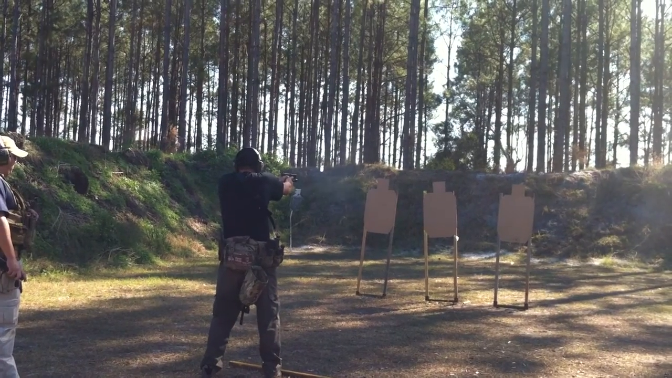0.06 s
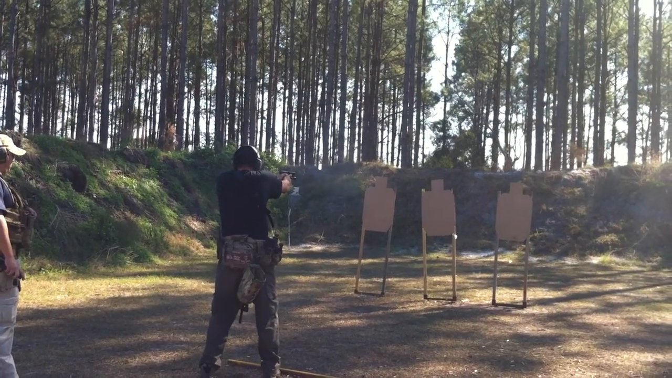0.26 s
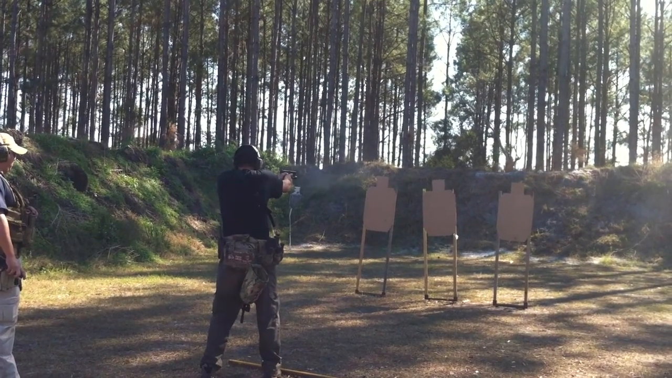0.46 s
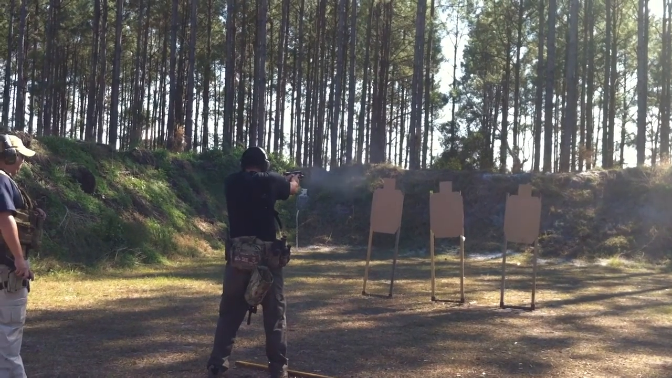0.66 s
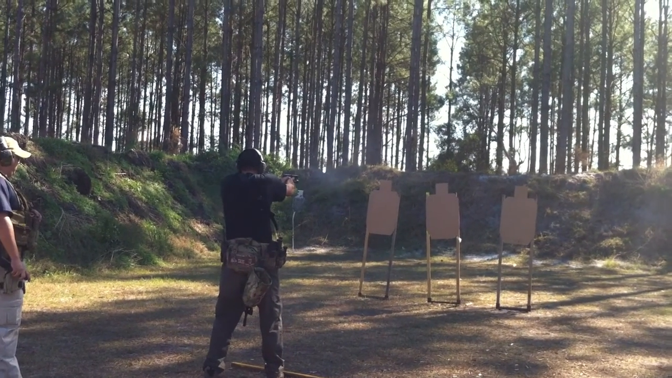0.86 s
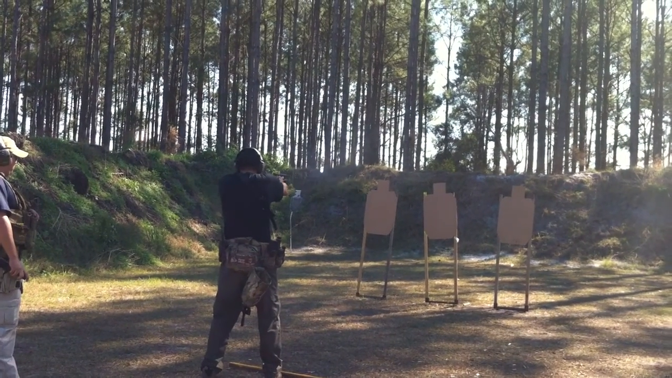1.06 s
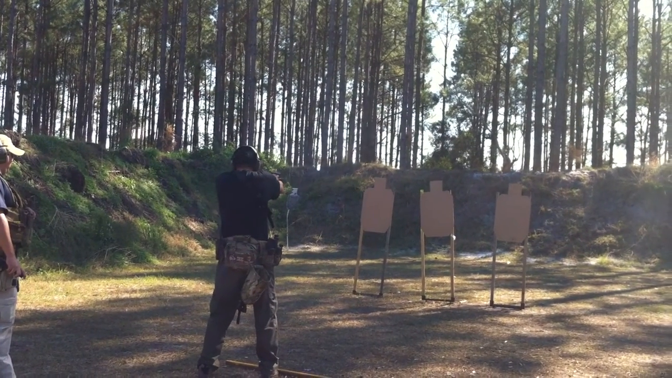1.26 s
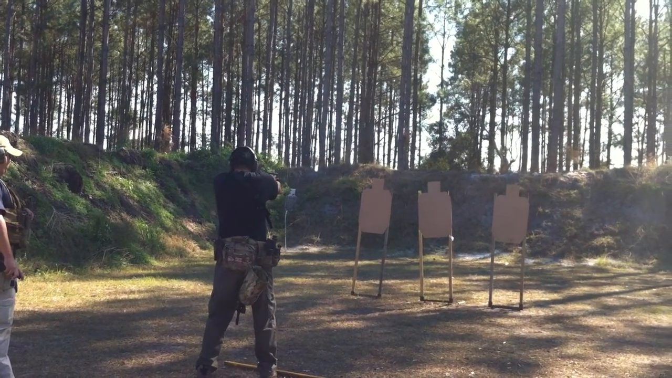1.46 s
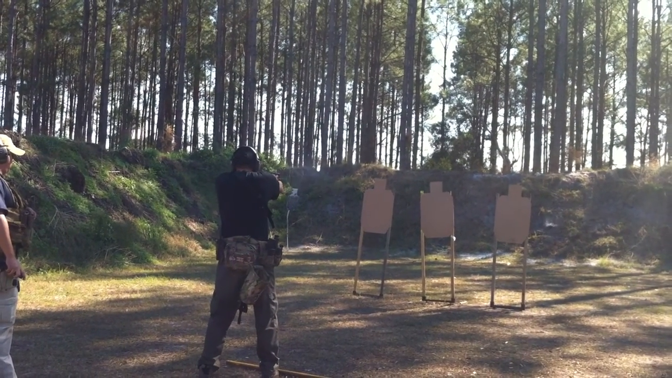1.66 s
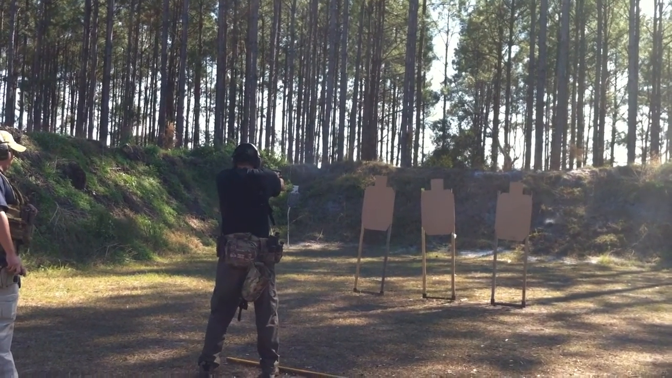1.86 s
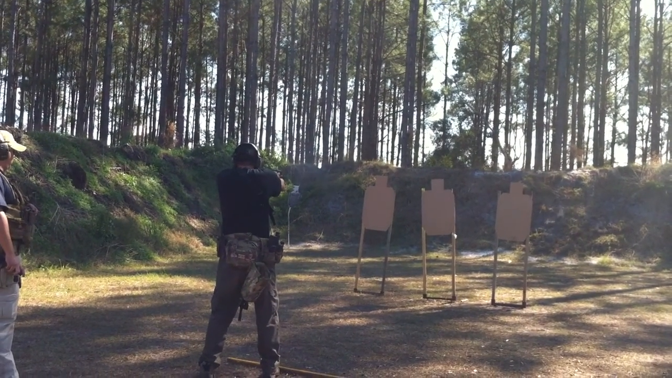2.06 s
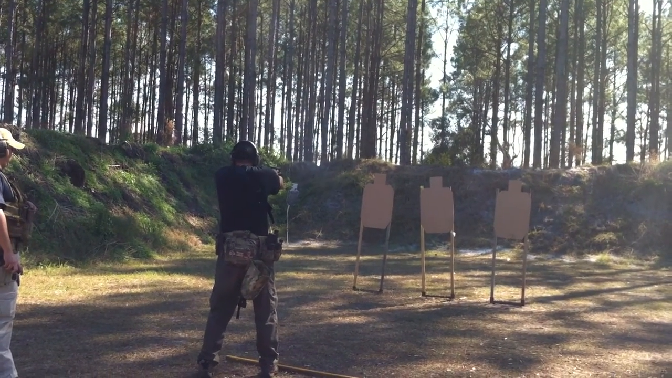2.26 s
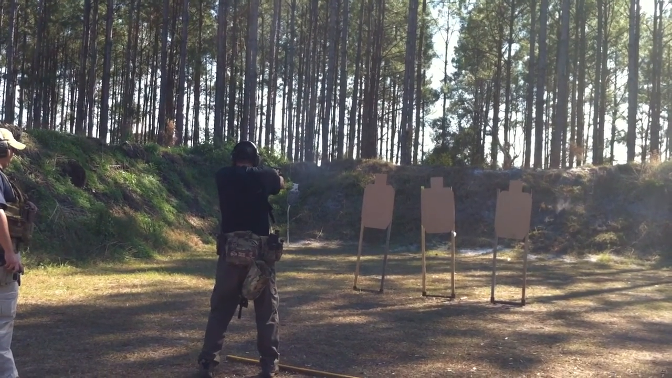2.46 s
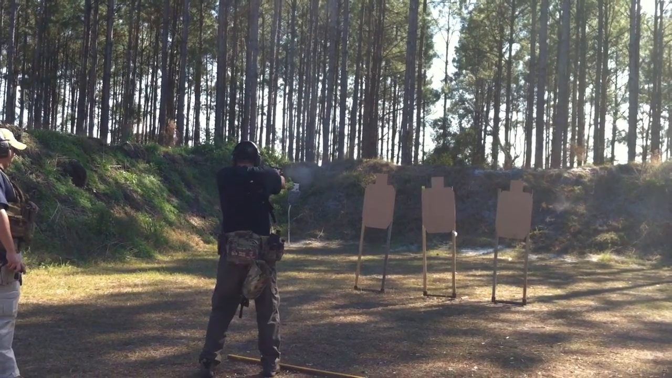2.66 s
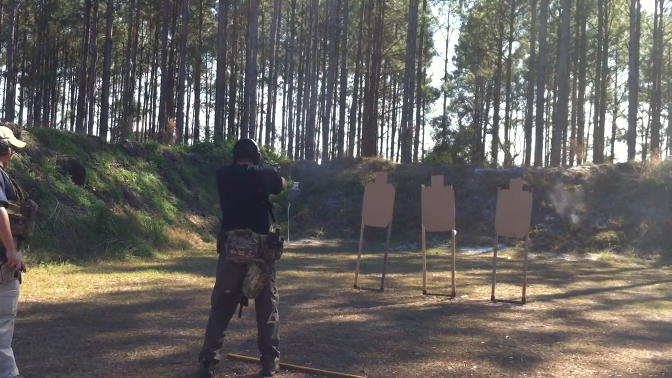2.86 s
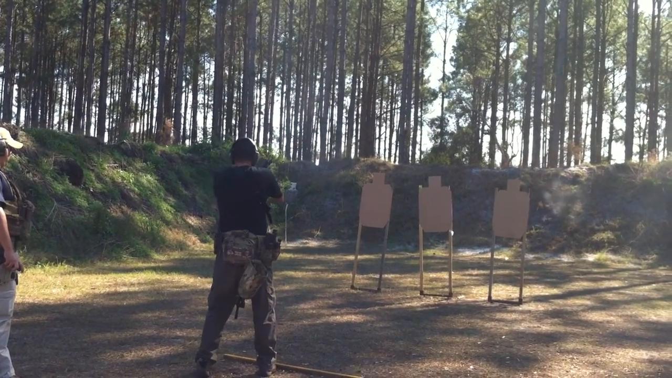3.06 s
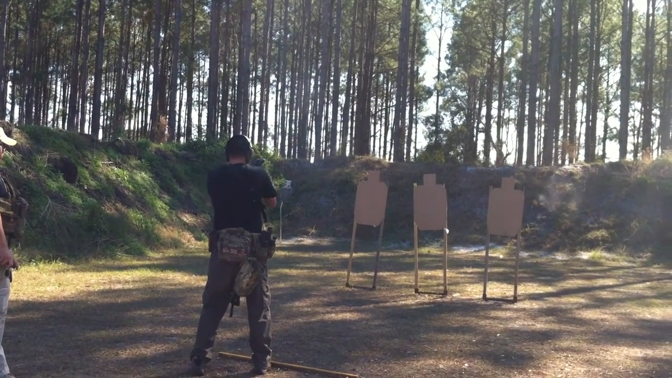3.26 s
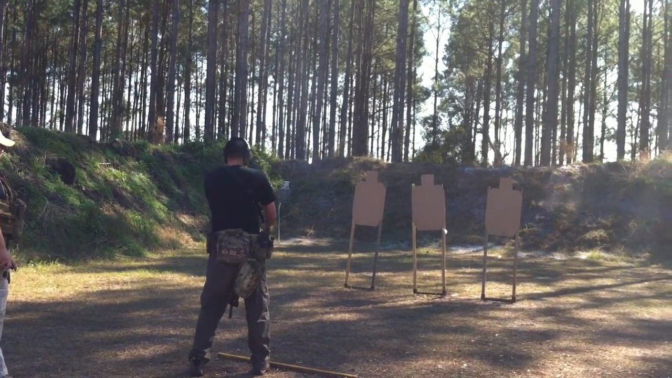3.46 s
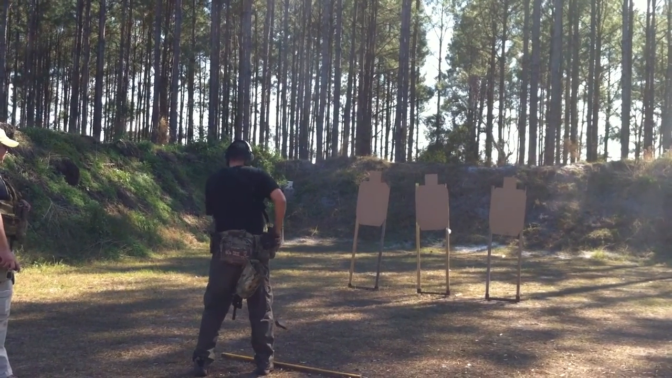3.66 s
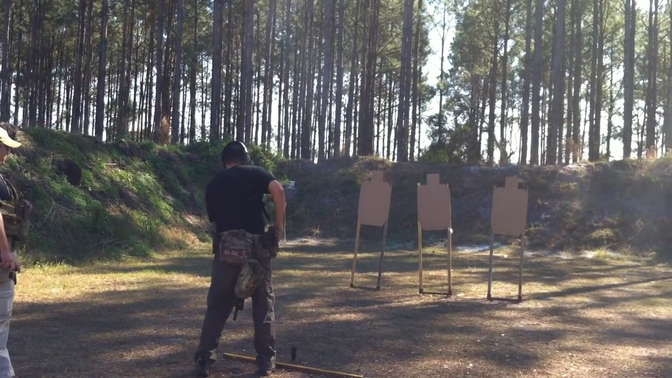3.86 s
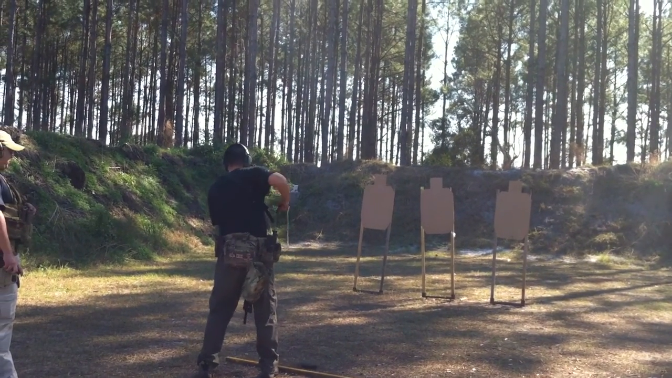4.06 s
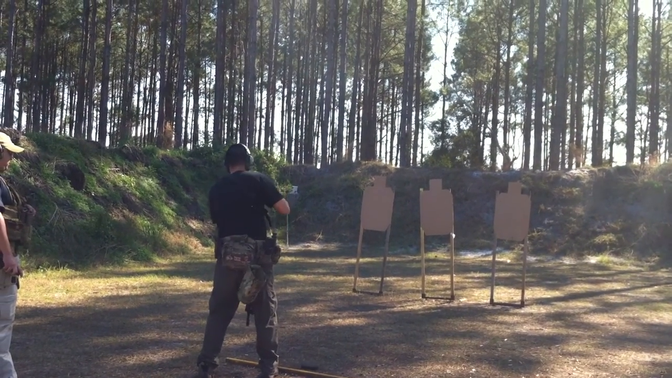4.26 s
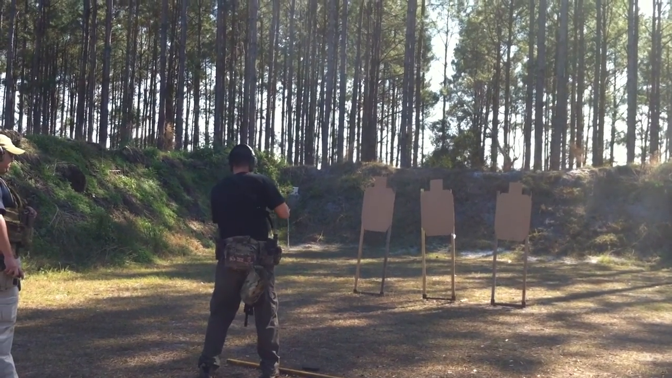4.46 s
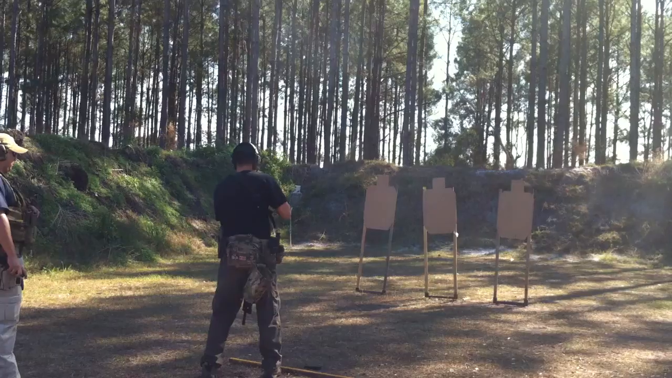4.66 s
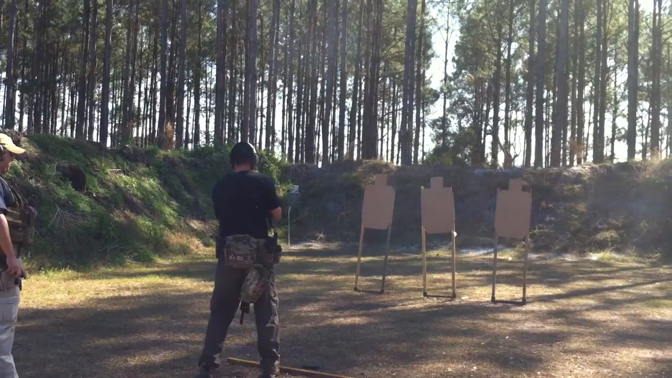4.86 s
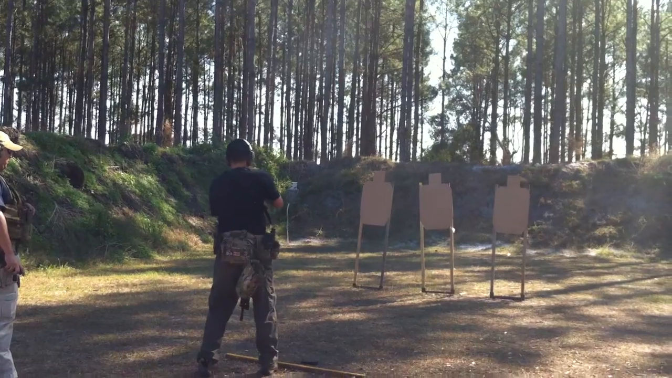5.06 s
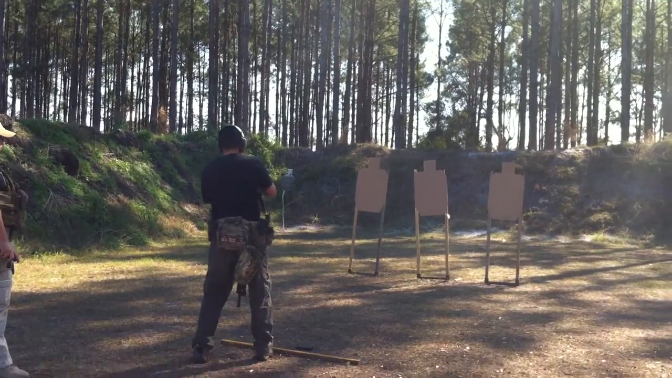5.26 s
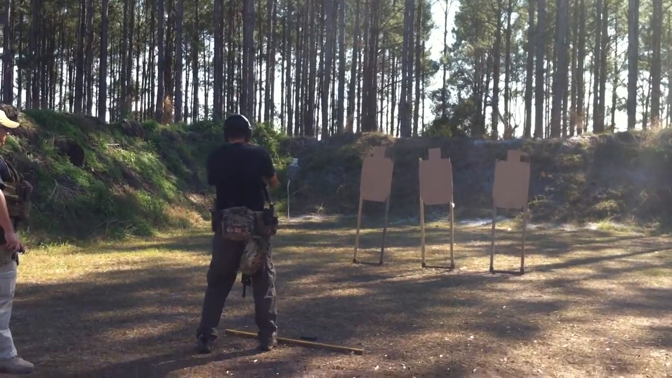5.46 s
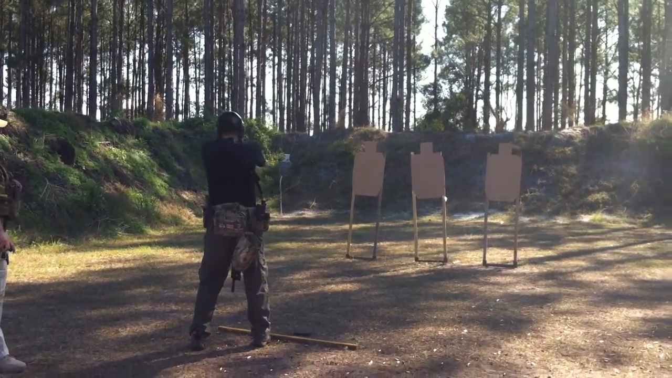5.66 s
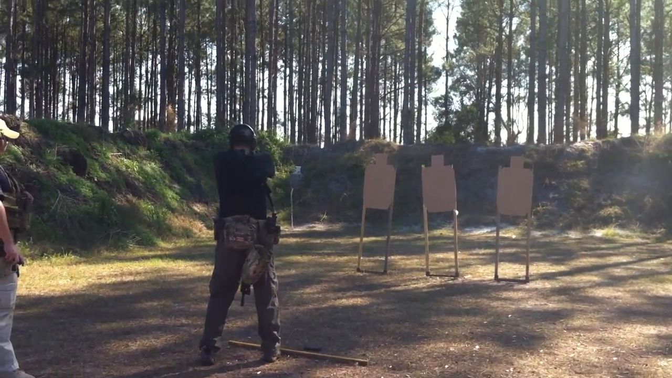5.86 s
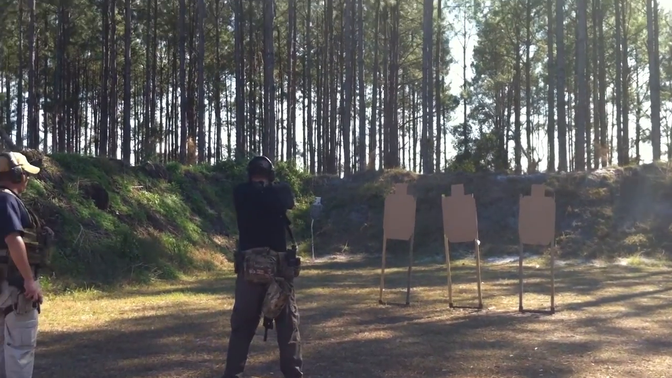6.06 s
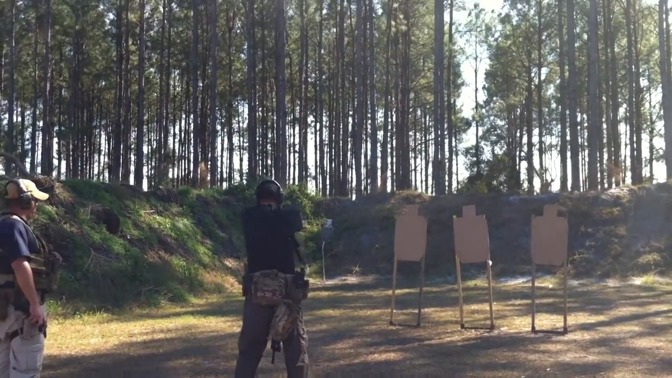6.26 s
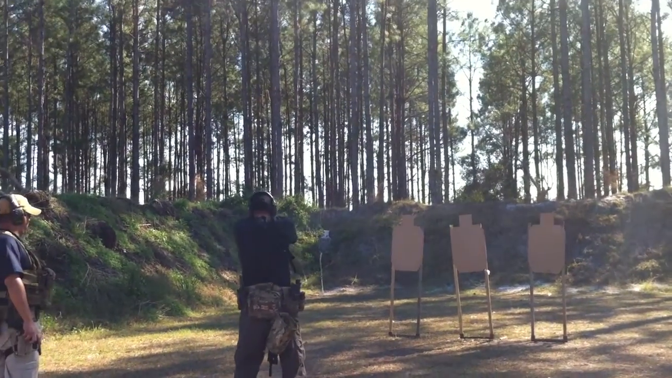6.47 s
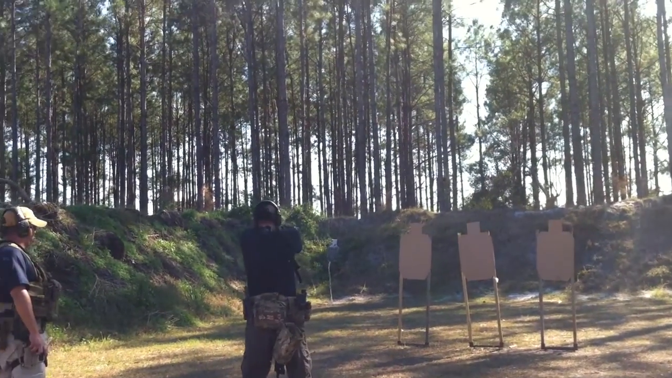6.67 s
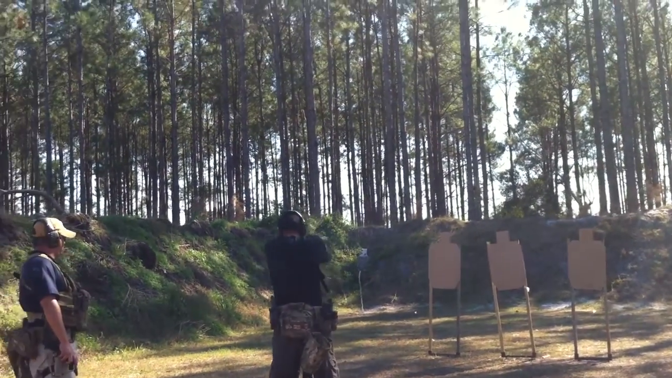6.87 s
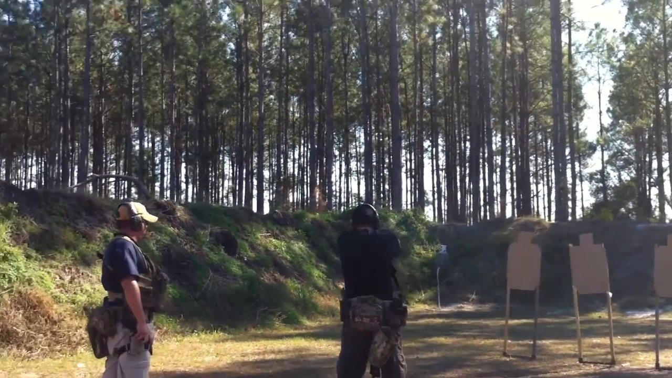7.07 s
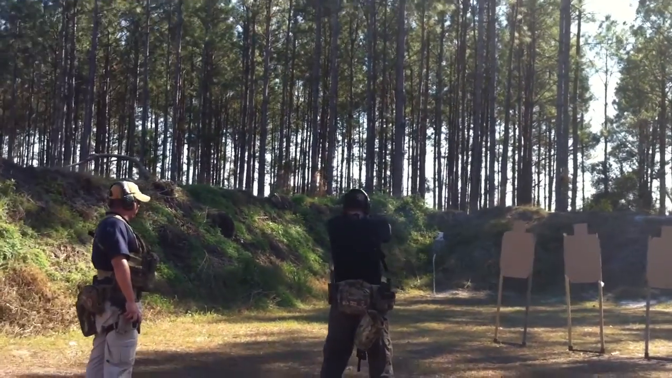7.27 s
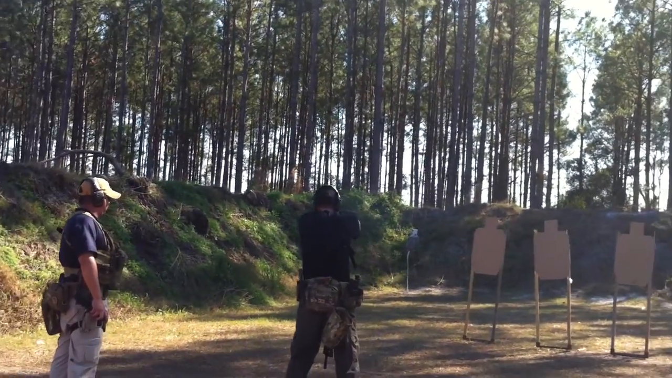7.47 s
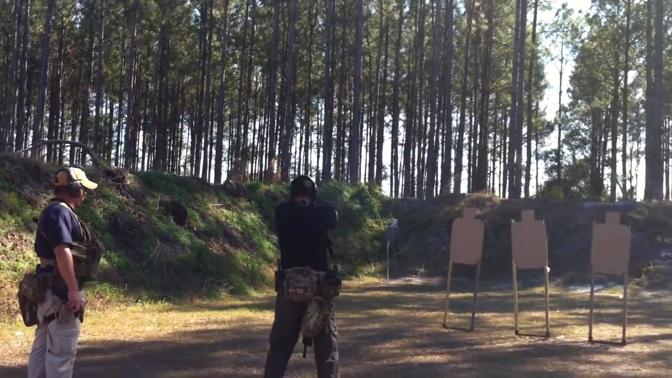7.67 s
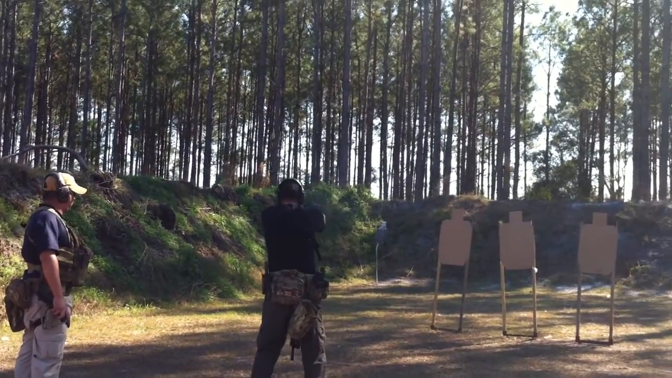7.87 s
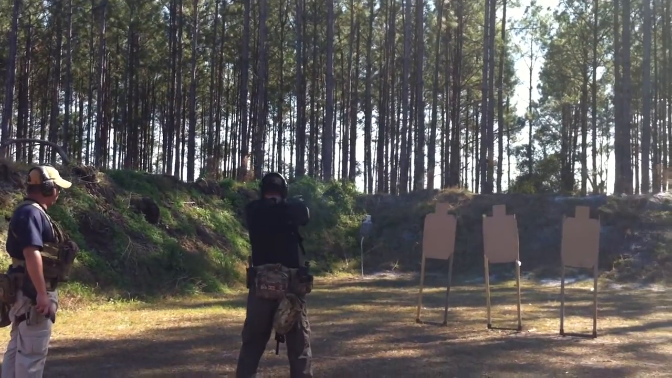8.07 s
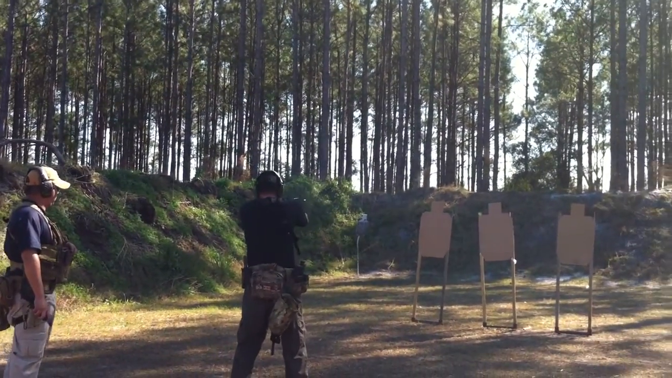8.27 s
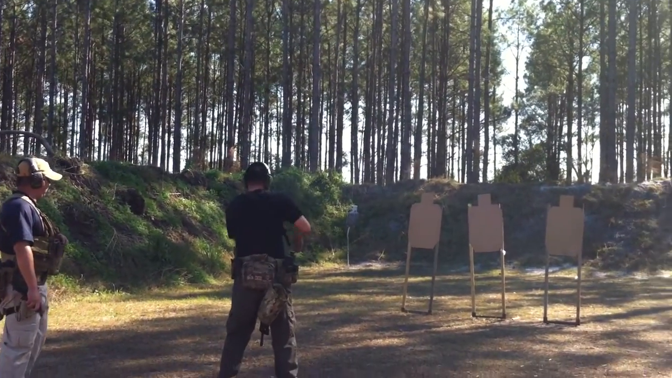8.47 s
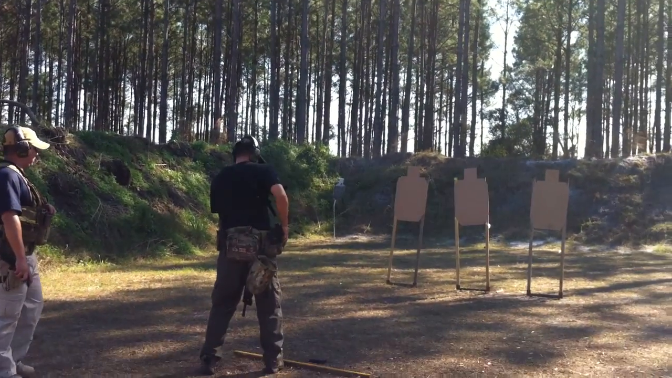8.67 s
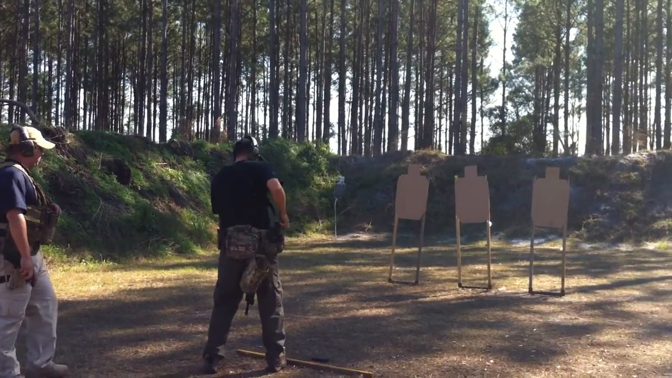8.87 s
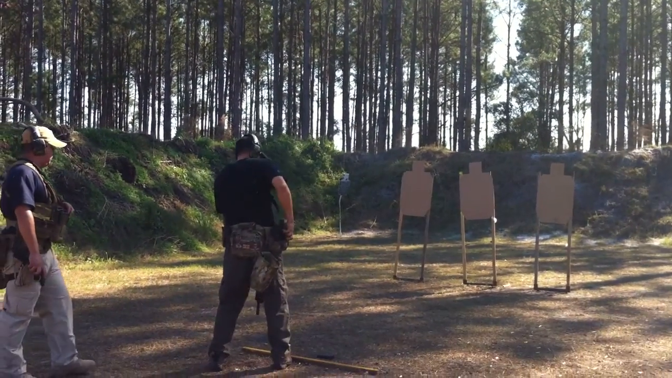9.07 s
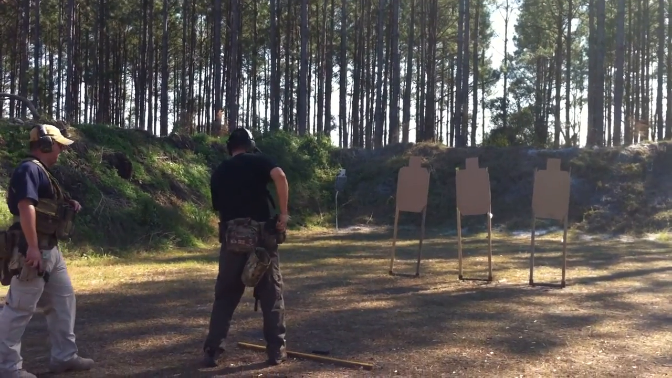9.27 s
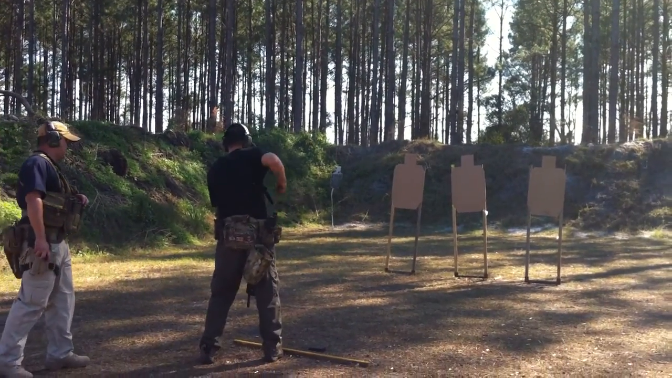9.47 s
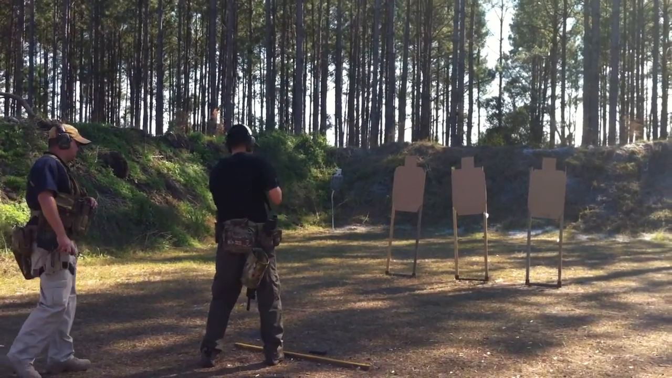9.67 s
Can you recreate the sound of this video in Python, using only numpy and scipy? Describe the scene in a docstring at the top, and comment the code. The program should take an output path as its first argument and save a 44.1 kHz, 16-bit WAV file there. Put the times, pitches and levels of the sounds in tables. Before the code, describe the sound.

Loud handgun fire bursts three, four, then five times among pines, each crack echoing and fading, with faint case tinkles and slide clicks between.

```python
"""First the faint tail of an earlier shot in the pines, over moving air and a far hum; then twelve pistol shots.
They come in three strings on an outdoor range with earth berms, the reload before the third. Each noise blast
overloads the one microphone, barks off a surface some five metres away, slaps off the berms and rolls away as
scattered, fading noise. Spent cases are thin decaying sines; magazine and slide are noise clicks over ringing
steel; cloth and bumps are soft noise swells."""
import sys
import numpy as np
from scipy import signal
from scipy.fft import rfft, irfft
from scipy.io import wavfile

SR = 44100
rng = np.random.default_rng(int(sys.argv[2]) if len(sys.argv) > 2 else 0)


def file_out(sig):
    """Save sig as 16-bit WAV at sys.argv[1]."""
    # one column per channel
    cols = np.atleast_2d(sig).T
    # limit, then scale
    lim = np.clip(cols, -1, 1)
    pcm = np.round(lim * 32767).astype(np.int16)
    wavfile.write(sys.argv[1], SR, pcm)


N = 428652
TIME = np.arange(N) / SR
AFTER = TIME[:2 * SR]  # time since a blow, s


def amp(db):
    """Decibels to gain."""
    return 10 ** (np.asarray(db) / 20)


def add(track, s, sound):
    """Mix a sound in at time s, cut off at the end of the track."""
    i = int(round(max(s, 0) * SR))
    track[i:i + len(sound)] += sound[:len(track) - i]


def on_octaves(hz, table, column=1):
    """Read a table's column along a log-frequency axis."""
    table = np.array(table)
    return np.interp(np.log(hz), np.log(table[:, 0]), table[:, column])


def noise(colour, size, tilt=0):
    """Noise of rms 1 with a (f/Hz, level/dB) colour, tilted by dB per octave above 500 Hz."""
    hz = np.maximum(np.fft.rfftfreq(size, 1 / SR), 1)
    octaves = np.log2(np.maximum(hz, 500))
    spectrum = rfft(rng.standard_normal(size))
    x = irfft(spectrum * amp(on_octaves(hz, colour) + tilt * octaves), size)
    return x / x.std()


def burst(colour, db, decay, hold=0, tilt=0, size=8192, rise=0.00051):
    """A sudden rush of noise that holds briefly and dies away."""
    t = AFTER[:size]
    attack = 1 - np.exp(-t / rise)
    fade = np.exp(-np.maximum(t - hold, 0) / decay)
    return amp(db) * noise(colour, size, tilt) * attack * fade


def ring(hz, db, decay):
    """A struck resonance: a sine that dies away exponentially."""
    t = AFTER[:SR // 2]
    return amp(db) * np.sin(2 * np.pi * hz * t) * np.exp(-t / decay)


def walk(rate, size):
    """A random wander through normal values, rate of them per second, joined by straight lines."""
    knots = rng.standard_normal(size // 200)
    return np.interp(TIME[:size] * rate, np.arange(len(knots)), knots)


def swell(s, spread):
    """A smooth hump around s seconds after a blow."""
    return np.exp(-((AFTER - s) / spread) ** 2)


def alike(pattern, fresh, share):
    """Blend a repeating pattern with fresh chance at constant power."""
    share = np.clip(share, 0, 1)
    return np.sqrt(share) * pattern + np.sqrt(1 - share) * fresh


# colour of the open air at the microphone: f/Hz, relative density level/dB
AIR_COLOUR = [(25, -18), (70, -15), (105, -12.5), (150, 0.5), (300, 0), (500, -0.5), (850, 2.5), (1150, -2),
              (1600, -12), (2500, -16.5), (5000, -24), (10000, -28.5), (15500, -27)]
AIR_DB = -55
# the far hum swells once, around one time
HUM_HZ, HUM_DB = 131.4, -73
HUM_SWELL_S, HUM_SWELL_HALF_S, HUM_SWELL_DB = 3.77, 0.47, 11


def background():
    """Air moving in the pines as unsteady coloured noise, and a far hum as one wavering sine."""
    air = noise(AIR_COLOUR, N) * amp(AIR_DB + 0.68 * walk(15, N))
    phase = 2 * np.pi * np.cumsum(HUM_HZ * (1 + 0.0063 * walk(6, N))) / SR
    louder = np.exp(-((TIME - HUM_SWELL_S) / HUM_SWELL_HALF_S) ** 4)
    hum_db = HUM_DB + HUM_SWELL_DB * louder + 1.6 * walk(7.1, N)
    return air + np.sqrt(2) * np.sin(phase) * amp(hum_db)


# rough ground and bank that throw back sprays: delay t/s, spread t/s, level/dB
PATCHES = [(.010, 0.0054, -27), (0.034, 0.0068, -24.5), (0.096, .012, -27)]
ROLL_DB = -33.5  # scatter from all around
# the edge of the wood answers in one swell
TREELINE_S, TREELINE_RISE_S, TREELINE_DECAY_S, TREELINE_DB = 0.15, 0.0117, 0.15, -26


def scatter_arriving():
    """How much scatter arrives when: an even roll, near sprays, then the swell from the edge of the wood."""
    past = AFTER - TREELINE_S
    rise = 0.5 * (1 + np.tanh(past / (2 * TREELINE_RISE_S)))
    treeline = amp(TREELINE_DB) * rise * np.exp(-np.maximum(past, 0) / TREELINE_DECAY_S)
    sprays = sum((amp(db) * swell(delay, spread)) ** 2 for delay, spread, db in PATCHES)
    return np.sqrt(amp(ROLL_DB) ** 2 + sprays + treeline ** 2)


# the air takes the treble, and bass slips away between the trunks
FADE_DB_PER_S, AIR_DB_PER_S_PER_KHZ = 15, 5.5
BASS_BELOW_HZ, BASS_DB_PER_S_PER_OCTAVE = 600, 14


def travel_loss(hz):
    """Decibels lost per second of travel through the wood."""
    octaves_below = max(np.log2(BASS_BELOW_HZ / hz), 0)
    treble_loss = AIR_DB_PER_S_PER_KHZ * hz / 1000
    return FADE_DB_PER_S + treble_loss + BASS_DB_PER_S_PER_OCTAVE * octaves_below


# colour of the scatter from ground and trees, before travel: f/Hz, relative density level/dB
FOREST_COLOUR = [(30, -25), (103, -20), (161, -10), (260, -5.5), (357, -2), (530, -5.5), (920, 2),
                 (1570, -6.5), (2090, -2.5), (2730, -5.5), (3420, -9), (5387, -11), (8760, -13),
                 (15500, -15.5)]


def forest(grain_db=1.5, patchy_db=2.5):
    """Countless small reflections off ground and trunks; the longer the path, the more treble is lost."""
    size = len(AFTER)
    hz = np.maximum(np.fft.rfftfreq(size, 1 / SR), 1)
    reflections = rng.standard_normal(size)
    # every grain of 30 samples has its own level
    grains = np.repeat(rng.standard_normal(size), 30)[:size]
    trunks = reflections * amp(grain_db * grains)
    spectrum = rfft(trunks) * amp(on_octaves(hz, FOREST_COLOUR))
    spectrum /= irfft(spectrum).std()
    centres = np.array(FOREST_COLOUR)[:, 0]
    out = 0
    # overlapping bands wander and fade separately
    for centre, band in zip(centres, np.eye(len(centres))):
        share = np.interp(np.log(hz), np.log(centres), band)
        level_db = patchy_db * walk(45, size) - travel_loss(centre) * AFTER
        out = out + irfft(spectrum * share) * amp(level_db)
    return out * scatter_arriving()


def fading_roll(db=-1.5):
    """The trees still ring faintly from a shot fired a moment earlier: scatter from 0.7 s after a blow."""
    out = np.zeros(N)
    add(out, 0, amp(db) * forest()[int(.7 * SR):])
    return out


def brush(s, length, hz, octaves, db, rough_db=5.0):
    """A soft, uneven swell of noise around one pitch, centred on time s."""
    out = np.zeros(N)
    colour = [(hz / 16 ** octaves, -50), (hz / 2 ** octaves, -6), (hz, 0),
              (hz * 2 ** octaves, -9), (hz * 16 ** octaves, -70)]
    rubbing = noise(colour, SR)
    rough = amp(db + rough_db * walk(170, SR))
    add(out, s - .5, rubbing * rough * swell(.5, length)[:SR])
    return out


def squeak(s, length, hz, rise, db):
    """A short, pure chirp that glides upwards."""
    t = TIME - s
    return amp(db) * np.sin(2 * np.pi * (hz + .5 * rise * t) * t) * np.exp(-(t / length) ** 2)


# cloth and gear brushing: t/s, spread t/s, centre f/Hz, level/dB
RUSTLES = [(3.938, .011, 9000, -59), (4.086, 0.027, 3480, -66), (4.307, 0.032, 2650, -64.5),
           (4.401, .044, 10000, -65), (4.423, 0.048, 2740, -61.5), (5.165, .047, 1920, -63.5),
           (9.537, 0.083, 10300, -65.5)]
RUSTLE_OCTAVES = .6
# dull, low bumps and rumbles: t/s, spread t/s, level/dB
BUMPS = [(1.621, 0.067, -63), (4.684, 0.013, -51), (6.36, .2, -57)]
BUMP_HZ, BUMP_OCTAVES = 168, .7
# one tiny rising squeak: t/s, spread t/s, f/Hz, rise Hz/s, level/dB
SQUEAK = (9.512, .005, 1661, 12000, -47)


def rustles():
    """Cloth brushing and dull bumps as noise swells, and a squeak."""
    cloth = sum(brush(s, length, hz, RUSTLE_OCTAVES, db) for s, length, hz, db in RUSTLES)
    bumps = sum(brush(s, length, BUMP_HZ, BUMP_OCTAVES, db, rough_db=2.2) for s, length, db in BUMPS)
    return cloth + bumps + squeak(*SQUEAK)


# colour of small contacts (gear, cases, handling), before tilt: f/Hz, relative density level/dB
CLICK_COLOUR = [(60, -1), (600, -10), (1100, 3.5), (1500, -0.5), (2400, 6.5), (4000, -1), (5300, -0.5),
                (7700, 1), (10500, 1), (12500, -1.5), (14300, -6), (16000, -8)]
# span of the reload: start t/s, end t/s
RELOAD_S = (4.2, 5.8)


def gear(count=7):
    """Faint ticks of loose gear as short noise bursts, scattered over the reload."""
    out = np.zeros(N)
    for s in np.linspace(*RELOAD_S, count) + .06 * rng.standard_normal(count):
        tick_db = -53.5 + 1.5 * rng.standard_normal()
        add(out, s, burst(CLICK_COLOUR, tick_db, decay=0.005, tilt=-1.5))
    return out


# spent cases landing: t/s, ring f/Hz, first ring level/dB, t60 t/s, tick level/dB
CASES = [(1.268, 10350, -55, .2, -70), (1.590, 11500, -51, .35, -36.5), (1.705, 10600, -52, 0.052, -65),
         (5.683, 10500, -54.5, .05, -68), (6.363, 10930, -44.5, .11, -47), (9.506, 10200, -50, .1, -50),
         (9.585, 10300, -50, .07, -58)]
# a case rebounds, typically sooner and weaker each time
BOUNCE_S, BOUNCE_SHRINK, BOUNCE_LOSS_DB = .026, .8, 9


def cases(count=3):
    """Brass ticks on the ground, rings thinly as a decaying sine and bounces."""
    out = np.zeros(N)
    for s, hz, db, t60, tick_db in CASES:
        add(out, s, burst(CLICK_COLOUR, db=tick_db, decay=0.0042, tilt=5.9))
        for k, (early, detune) in enumerate(rng.standard_normal((count, 2))):
            add(out, s, ring(hz * (1 + .004 * detune), db - k * BOUNCE_LOSS_DB, t60 / np.log(1000)))
            s = s + BOUNCE_S * BOUNCE_SHRINK ** k * (1 - .15 * early)
    return out


# holster, magazine and slide: t/s, level/dB, decay t/s, tilt dB/octave
CLICKS = [(3.9167, -36, .009, -3), (4.1541, -42, 0.0067, -4.5), (4.206, -47, 0.0058, .7),
          (4.4194, -49, 0.0065, -5), (4.6807, -45, .0075, 4.5), (4.772, -45, .009, -5),
          (4.985, -32.5, 0.0072, -2), (5.017, -39.5, .0045, -2.5), (5.3344, -37.5, 0.0031, -2),
          (5.4225, -41, 0.019, 0.5), (5.446, -21.5, 0.0046, 2.5), (5.4748, -36, 0.0083, 2.5),
          (7.753, -34.5, .0024, -1)]
# metallic wash that the trees return from a click: f/Hz, relative density level/dB
WASH_COLOUR = [(100, -21.5), (1100, -2), (2400, -3.5), (4400, -3), (5350, 6), (5900, -0.5), (6800, 0),
               (7700, -9), (9000, -1.5), (12500, -4), (14200, -12.5), (16000, -12.5)]
# the steel of the pistol: nominal f/Hz, mean level/dB relative to the click, t60 t/s
STEEL = [(2455, -19, 0.042), (5360, -17.5, 0.069), (5640, -37, .3), (6520, -13.5, 0.04), (9000, -39, .1),
         (11100, -23, 0.036), (14130, -30, .06), (14500, -16, 0.044)]


def handling(rattle_db=4.0):
    """Contacts chatter, ring the steel of the pistol and leave a faint wash among the trees."""
    out = np.zeros(N)
    for s, db, decay, tilt in CLICKS:
        contact = burst(CLICK_COLOUR, db, decay, tilt=tilt)
        # chatter breaks the contact up without changing its energy
        chatter = contact * amp(rattle_db * walk(504, SR)[:len(contact)])
        add(out, s, chatter * contact.std() / chatter.std())
        add(out, s, burst(WASH_COLOUR, db=db - 33.5, decay=0.18, size=32768))
        for hz, mode_db, t60 in STEEL:
            # the grip shifts pitch and level of each mode differently each time
            detune, grip = rng.standard_normal(2)
            mode_hz = hz * (1 + 0.0044 * detune)
            add(out, s, ring(mode_hz, db + mode_db + 2.5 * grip, t60 / np.log(1000)))
    return out


# low boom that the earth banks return: delay t/s, spread t/s, level/dB before each shot's gain
BOOMS = [(0.034, 0.0032, -25.5), (.046, 0.0051, -21), (.072, 0.015, -30.5), (.100, 0.032, -33.5)]
# colour of that boom, also of the rumble from the ground: f/Hz, relative density level/dB
BOOM_COLOUR = [(30, -33), (90, -19.5), (160, 0.5), (260, -5), (370, 3.5), (500, -3), (800, -8.5),
               (2000, -35), (8000, -75.5)]


def berms():
    """Rounded low returns from the earth banks: humps of dull noise."""
    size = SR // 4
    out = np.zeros(size)
    for delay, spread, db in BOOMS:
        out += amp(db) * noise(BOOM_COLOUR, size) * swell(delay, spread)[:size]
    return out


# colour of the crack in the near echo: f/Hz, relative density level/dB
ECHO_COLOUR = [(40, -20), (200, -7), (700, 1), (1100, 7.5), (1400, -2.5), (2400, 0.5), (3500, -7),
               (5200, -5), (8000, -13.5), (15500, -13.5)]


def near_echo(bark_hz, crack_db):
    """A broad surface some five metres off returns a hollow bark, and the crack the muzzle sends its way."""
    out = np.zeros(SR)
    t = AFTER[:SR // 2]
    push = swell(.0022, .0015)[:len(t)]
    # the bark sinks from 1.38 towards 0.66 of its base pitch; its steep wave front adds an overtone
    wobble = 1 + .03 * rng.standard_normal()
    hz = bark_hz * wobble * (.66 + .72 * np.exp(-t / 0.0026))
    phase = 2 * np.pi * np.cumsum(hz) / SR
    add(out, 0, push * (amp(1.0) * np.sin(phase) + amp(-7) * np.sin(2 * phase)))
    add(out, .0008, -ring(hz=203, db=-10.0, decay=0.003))
    # the crack comes back straight, then by way of the ground, then as scatter
    add(out, .0002, burst(ECHO_COLOUR, db=crack_db - 5.0, decay=0.00085, hold=0.0038))
    add(out, .0072, burst(ECHO_COLOUR, db=crack_db - 18.0, decay=0.0072, hold=0.00057))
    add(out, .0085, burst(ECHO_COLOUR, db=crack_db - 28.0, decay=0.018))
    return out


# slaps off the berms: delay t/s, level/dB before each shot's share, decay t/s
SLAPS = [(0.0663, -7.5, .0007), (0.0716, -7, 0.00076), (.1225, -24, 0.0012)]
# colour of the slaps: f/Hz, relative density level/dB
SLAP_COLOUR = [(40, -29.5), (400, -2.5), (1600, -8.5), (2050, 4), (2450, 3), (3000, -8.5), (5000, -4),
               (7500, -10.5), (15500, -12.5)]


def add_slaps(track, s, slap_db):
    """The berms return crisp noise ticks, each with a short, woody ring."""
    for lag, db, decay in SLAPS:
        level_db = db + slap_db
        add(track, s + lag, burst(SLAP_COLOUR, level_db, decay, hold=0.0004, rise=.0003))
        add(track, s + lag + 0.00035, ring(hz=2428, db=level_db - 6, decay=0.0012))


# colour of the muzzle crack: f/Hz, relative density level/dB
CRACK_COLOUR = [(40, -19), (200, -15.5), (800, 1.5), (1500, -1.5), (2200, -0.5), (3100, 2.5), (4500, -2.5),
                (7500, -7.5), (10500, -5), (12500, -10), (15500, -11.5)]


def muzzle():
    """A few milliseconds of violent, bright noise."""
    return burst(CRACK_COLOUR, db=-2.0, decay=0.0017, hold=0.0037, rise=0.001)


# pressure wave's swings, direct and off the ground: delay t/s, mean f/Hz, relative level/dB, decay t/s
SWINGS = [(.0008, 200.9, -22, 0.012), (.0036, 370, -8.5, 0.0023), (.0064, 260, -8, 0.0023),
          (.0068, 740, -13.5, 0.0081)]


def blast(crack):
    """The muzzle crack, its bounce off the ground, the slow swings of the pressure wave and their rumble."""
    out = np.zeros(len(AFTER))
    add(out, 0, crack)
    add(out, .0066, burst(CRACK_COLOUR, db=-11.5, decay=0.0024, hold=0.0039, tilt=-4.5, rise=0.00044))
    # the ground nearby adds a low rumble and a dull spray of reflections
    add(out, .0050, burst(BOOM_COLOUR, db=-22, decay=0.0096, rise=0.0024))
    add(out, .0110, burst(CRACK_COLOUR, db=-29, decay=0.0087, tilt=-8.5))
    for delay, hz, db, decay in SWINGS:
        add(out, delay, ring(hz * (1 + 0.081 * rng.standard_normal()), db, decay))
    return out


# twelve shots: t/s, blast level/dB, relative crack level/dB in the near echo,
# share level/dB sent at the berms, stance number
SHOTS = [ (0.0838, -1, 4.5, -1.5, 0), (0.4686, 0, 5, 3, 0), (.8151, 0, 3, 1.5, 0),
         (1.766, -1.5, 1, -5.5, 1), (2.1475, -1.5, 1, -7.5, 1), (2.4959, -1, 2, -8, 1),
         (2.8418, -0.5, -3, -14.5, 1), (6.512, -1.5, -5, -14, 2), (7.0004, -0.5, -5, -26, 2),
         (7.4046, -2, -5.5, -29, 2), (7.8883, -3, -6, -27.5, 2), (8.2161, -2, -4.5, -9, 2)]
# where the shooter stands for each string: near echo delay t/s, bark base f/Hz, forest level/dB
STANCES = [(.0271, 706, .5), (.0271, 915, 2.5), (.0266, 955, 1.7)]
FOREST_FOLLOWS = .2  # dB more from the trees for each dB sent at the berms


def shots():
    """Every shot with its echoes; fired from one place, shots wake nearly the same pattern of reflections."""
    out = np.zeros(N)
    patterns = [(muzzle(), berms(), forest()) for _ in STANCES]
    for s, blast_db, crack_db, slap_db, stance in SHOTS:
        place = int(round(stance)) % len(STANCES)
        crack, boom, scatter = patterns[place]
        delay, bark_hz, forest_db = STANCES[place]
        add(out, s, amp(blast_db) * blast(alike(crack, muzzle(), share=0.6)))
        add(out, s + delay, near_echo(bark_hz, crack_db))
        add_slaps(out, s, slap_db)
        far = amp(forest_db + FOREST_FOLLOWS * slap_db)
        add(out, s, far * alike(boom, berms(), share=0.96))
        add(out, s, far * alike(scatter, forest(), share=.72))
    return out


def scene():
    """Everything as it reaches one microphone."""
    firing = shots() + fading_roll()
    shooter = handling() + gear() + cases() + rustles()
    return (firing + shooter + background())[None]


def record(dry, ceiling=0.52):
    """The recorder drops the deepest bass, saturates on the blasts and cuts the top."""
    thinned = signal.sosfilt(signal.butter(2, 80, "high", fs=SR, output="sos"), dry)
    squashed = ceiling * np.tanh(thinned / ceiling)
    coupled = signal.sosfilt(signal.butter(1, 85, "high", fs=SR, output="sos"), squashed)
    top_cut = signal.ellip(10, .2, 75, 15750, fs=SR, output="sos")
    return signal.sosfilt(top_cut, coupled)


dry = scene()
out = record(dry)
file_out(out)
```